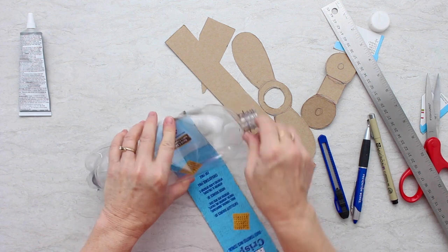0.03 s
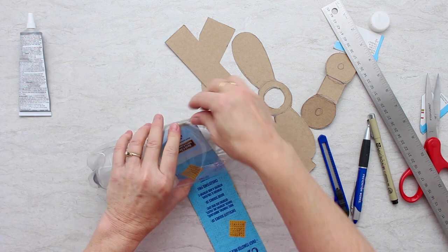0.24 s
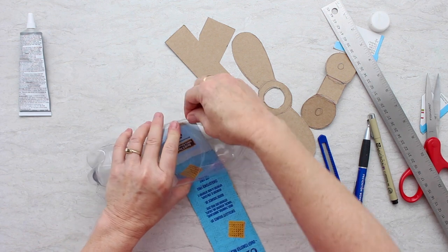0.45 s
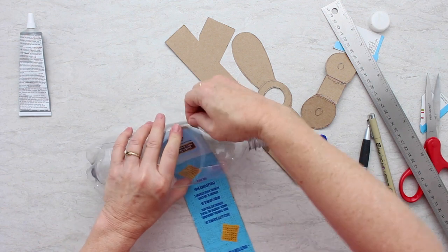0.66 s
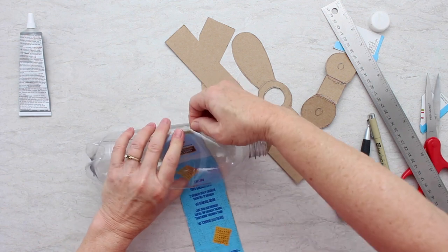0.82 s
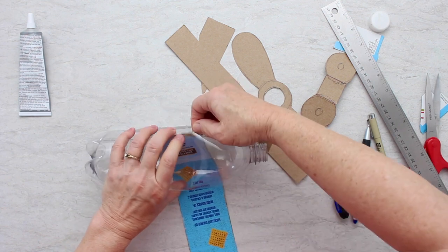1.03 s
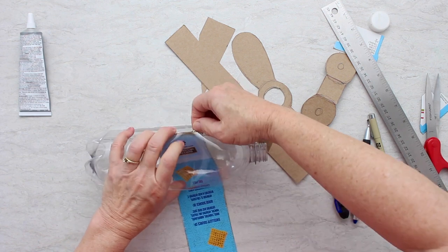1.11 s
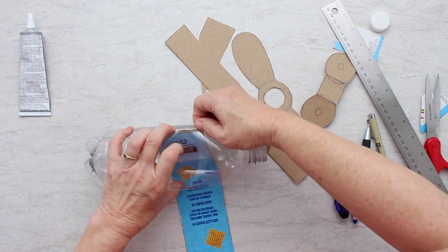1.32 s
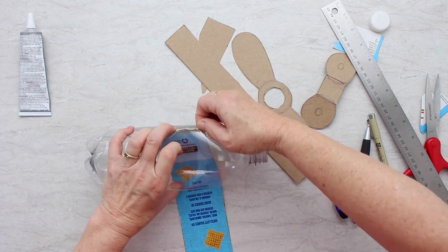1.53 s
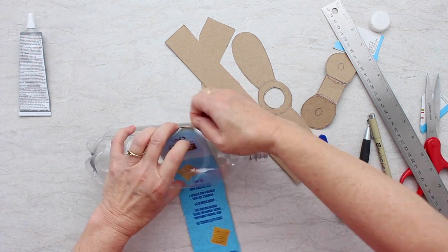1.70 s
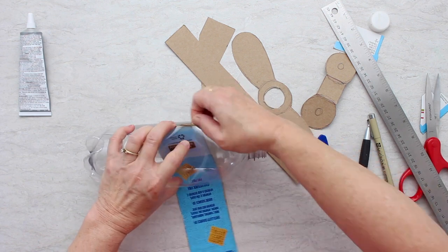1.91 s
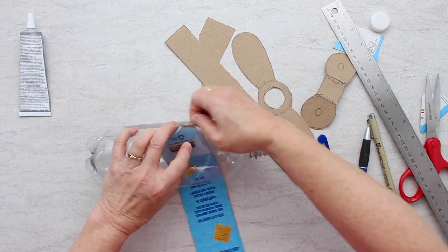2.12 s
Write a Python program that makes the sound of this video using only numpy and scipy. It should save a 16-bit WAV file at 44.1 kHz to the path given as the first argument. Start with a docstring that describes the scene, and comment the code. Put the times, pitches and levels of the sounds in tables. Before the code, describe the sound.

Two sharp, hollow snaps come from a squeezed plastic bottle, with lighter clicks and dull taps around them. Cardboard pushed through its wall rubs and creaks faintly. The microphone is close above a table in a small, softly humming room.

```python
"""Cardboard through a squeezed bottle

A strip of cardboard is pushed through a slit in a thin plastic bottle on a table. Stick-slip friction
makes it hiss, scrape and creak in short strokes. The squeezed wall buckles with sharp snaps that ring
the shell's resonances, and its panels thump under snaps and fingers. A small room with a low hum
reverberates; a stereo microphone hangs close above."""
import sys
import numpy as np
from scipy import signal
from scipy.fft import rfft, irfft, next_fast_len
from scipy.io import wavfile
from scipy.ndimage import uniform_filter1d

SR = 44100
rng = np.random.default_rng(int(sys.argv[2]) if len(sys.argv) > 2 else 0)


def dump_mix(stems):
    """Bounce the given channels to the path in sys.argv[1] as a 16-bit WAV at rate SR."""
    frames = np.atleast_2d(stems).T  # one column per channel
    limited = np.clip(frames, -1, 1)  # hard clip at full scale
    pcm = np.round(limited * 32767).astype(np.int16)
    wavfile.write(sys.argv[1], SR, pcm)


N = 94815


def undb(db):
    """Amplitude ratio of a level in decibels."""
    return 10 ** (np.asarray(db) / 20)


def unit(x):
    """Normalisation to rms 1."""
    return x / np.sqrt(np.mean(x ** 2) + 1e-20)


def colour(x, points, resonances=()):
    """Minimum-phase filtering through (Hz, dB) points, with (Hz, width in Hz, dB) resonances on top."""
    size = 2 * next_fast_len(len(x))
    hz, db = np.array(points, float).T
    freqs = np.maximum(np.fft.rfftfreq(size, 1 / SR), 1)
    power = 1 + sum(undb(peak) ** 2 / (1 + ((freqs - centre) / (width / 2)) ** 2)
                    for centre, width, peak in resonances)
    gain = np.sqrt(power) * undb(np.interp(np.log(freqs), np.log(hz), db))
    cepstrum = irfft(np.log(gain))
    cepstrum[1:size // 2] *= 2  # folding onto positive time makes the filter causal
    cepstrum[size // 2 + 1:] = 0
    return irfft(rfft(x, size) * np.exp(rfft(cepstrum)))[:len(x)]


def narrow_band(x, hz, width):
    """Band-pass filtering around one frequency, at rms 1."""
    freqs = np.fft.rfftfreq(N, 1 / SR)
    return unit(irfft(rfft(x) / (1 + ((freqs - hz) / (width / 2)) ** 2), N))


def decay(t, t60):
    """Exponential damping from t = 0, by 60 dB in t60 seconds."""
    return np.exp(-np.log(1000) * np.maximum(t, 0) / max(t60, 1e-3))


def burst(envelope):
    """Whitened noise: its spectrum is flattened and its envelope restored in turn."""
    x = rng.standard_normal(len(envelope)) * envelope
    for _ in range(8):
        spectrum = rfft(x)
        band_power = uniform_filter1d(abs(spectrum) ** 2, size=9)
        x = irfft(spectrum / np.sqrt(band_power + 1e-12), len(x))
        local_power = abs(uniform_filter1d(x ** 2, size=65))
        x = x * envelope / np.sqrt(local_power + 1e-16)
    return x


def add(out, start_s, sound):
    """Superposition of a sound from its starting time."""
    i = int(start_s * SR)
    out[:, i:i + sound.shape[-1]] += sound[..., :N - i]


# Spectrum of the side channel relative to the mid. Each row: frequency in Hz, gain in dB.
SIDE_SPECTRUM = [(60, -12), (350, -7.5), (700, -7.5), (1300, -1.5), (2400, 0), (4400, 0.5), (8000, 3.5),
                 (16000, 2.5)]

def stereo(mid, side):
    """Mid-side stereo: diffuse sound differs less between left and right at long wavelengths."""
    return mid + np.array([[1], [-1]]) * colour(side, SIDE_SPECTRUM)


# Spectrum of the room noise. Each row: frequency in Hz, gain in dB.
NOISE_SPECTRUM = [(25, -58), (42, -40), (62, 4.5), (110, -6), (160, -1), (300, -7.5), (650, -7.5),
                  (1000, -14.5), (2000, -21.5), (5000, -26), (10000, -34), (16000, -42)]
# Bands of the hum. Each row: centre in Hz, width in Hz, level in dB.
HUM_BANDS = [(60.1, 6.7, -59), (107.8, 16.6, -52)]

def background(noise_db=-31):
    """Soft broadband noise and a low hum, which wavers as neighbouring frequencies in each band beat."""
    mid, side = (undb(noise_db) * colour(rng.standard_normal(N), NOISE_SPECTRUM) for _ in range(2))
    for hz, width, db in HUM_BANDS:
        mid += undb(db) * narrow_band(rng.standard_normal(N), hz, width)
    return stereo(mid, side)


def slips(per_second=2600, scatter_db=0):
    """Stick-slip friction as a Poisson process: impulses of random sign, equal in size at zero scatter."""
    slipping = rng.random(N) < per_second / SR
    sign = rng.choice([-1, 1], N)
    size = undb(scatter_db * np.minimum(rng.exponential(size=N), 4))
    return unit(slipping * sign * size)


# Strokes of the card. Each row: peak time, rise and fall in seconds, hiss level and grip level in dB.
CARD_STROKES = [(.01, 0.044, 0.046, -40.5, -44), (.18, 0.069, 0.046, -40, -52),
                (.33, 0.039, 0.023, -43, -38.5), (.54, 0.019, .06, -47, -54),
                (0.571, 0.011, .022, -39, -34.5), (0.681, 0.017, 0.043, -44.5, -36.5),
                (.79, 0.12, 0.14, -42, -46), (0.935, 0.02, 0.033, -38.5, -35),
                (1.101, 0.0012, 0.0048, -44, -35), (1.76, 0.036, 0.039, -39, -37.5),
                (1.797, 0.021, 0.0074, -55, -29), (1.881, 0.0047, 0.0071, -50, -45),
                (1.966, 0.022, 0.031, -38.5, -38.5), (2.14, 0.081, .05, -48, -50)]
# Spectra of the sliding hiss and of the gripping scrape. Each row: frequency in Hz, gain in dB.
HISS_SPECTRUM = [(200, -4), (1000, -9.5), (2000, -6.5), (3200, 1), (4900, 1.5), (5700, -7), (8000, -10.5),
                 (12000, -17), (16000, -29.5)]
GRIP_SPECTRUM = [(100, -18), (180, -1), (370, 14), (560, -7.5), (800, -3.5), (1300, -11.5), (2300, -9),
                 (3500, -12.5), (5000, -25), (8000, -23), (16000, -35)]
# Resonances of the bottle's shell. Each row: frequency in Hz, bandwidth in Hz, peak height in dB.
SHELL_MODES = [(629.8, 39, 14), (800, 63, 3.5), (922, 110, 8), (1170, 39, 10), (1367, 37, 11.5),
               (1530, 80, 10.5), (1814, 28, 13.5), (2051, 103, 12.5), (2314, 47, 11), (2596, 44, 13.5),
               (2710, 46, 6.5), (2874, 56, 10.5), (3196, 103, 9.5), (3564, 68, 10), (3633, 44, 5),
               (3978, 63, 12), (4704, 84, 4.5), (5325, 84, 6), (6410, 150, 8.5), (7380, 85, 10)]

def scrapes(side_db=-8):
    """Frictional excitation: the sliding card hisses; where it grips, its slips drive the shell."""
    t = np.arange(N) / SR
    hiss_power, grip_power = np.zeros(N), np.zeros(N)
    for peak, rise_s, fall_s, hiss_db, grip_db in CARD_STROKES:
        stroke = np.exp(-((t - peak) / np.where(t < peak, rise_s, fall_s)) ** 2)
        hiss_power += stroke * undb(hiss_db) ** 2
        grip_power += stroke * undb(grip_db) ** 2
    mid, side = (colour(np.sqrt(hiss_power) * slips(), HISS_SPECTRUM)
                 + colour(np.sqrt(grip_power) * slips(), GRIP_SPECTRUM, SHELL_MODES) for _ in range(2))
    return stereo(mid, undb(side_db) * side)


# Creaks of the card. Each row: peak time and half length in seconds, pitch in Hz, level in dB.
CARD_CREAKS = [(0.054, 0.004, 2100, -43.5), (0.532, .01, 3320, -51), (0.932, .025, 2150, -42)]

def creaks(width_hz=300):
    """Narrow-band stick-slip: for a moment the slips against the cut edge gather around one pitch."""
    out, t = np.zeros(N), np.arange(N) / SR
    for peak, half_length, hz, db in CARD_CREAKS:
        envelope = np.exp(-((t - peak) / half_length) ** 2)
        out += undb(db) * envelope * narrow_band(slips(), hz, width_hz)
    return out


# Snaps of the wall, and in the last row a small crackle within a card stroke. Each row: start in seconds, level
# in dB, # the crack's 60 dB decay time in seconds, then a gain in dB at each frequency of TINT_HZ.
WALL_SNAPS = [(0.2246, -6.5, 0.024, -14, 6, -7, -2.4, 2, 2, -2),
              (0.5595, -25, 0.041, -17, 3.5, -4.5, -2.5, 3, 0.5, 3.5),
              (0.5773, -28.5, 0.054, 5, -2, 2, 1, 3, -15, 6),
              (0.81, -23.5, 0.0083, -3, 1.5, 9, -1.2, -3.5, -6, -38),
              (1.239, -33.5, 0.023, -2, 0.5, -7, 0.71, 1, 6.5, 16),
              (1.2942, -9.5, 0.029, -2, -3, 2, -0.3, -1.5, -7, -5),
              (1.531, -51.5, 0.0068, -1, -6, -13, 0, 4.5, 4, 16),
              (1.7934, -30, .016, 13, 5, 7.5, -0.18, -3, -9, -10)]
# Frequencies in Hz at which each snap has its own tint.
TINT_HZ = [250, 760, 1350, 2100, 3400, 4700, 9000]
# Spectrum common to all snaps. Each row: frequency in Hz, gain in dB.
CRACK_SPECTRUM = [(100, -32), (200, -13), (300, 1), (480, -8), (640, -4.5), (2200, -3), (3800, -3.5),
                  (5100, -1), (5700, -10.5), (7500, -17.5), (8500, -21), (16000, -47.5)]

def snaps(rise_s=0.00061, hold_s=0.00267, side_db=-8):
    """Buckling: the wall gives way in a brief crack, and the shell rings on in its natural modes. The last row
    is a small crackle within a card stroke, which rings the shell in the same way."""
    out, t = np.zeros((2, N)), np.arange(8192) / SR
    for start, db, t60, *tint_db in WALL_SNAPS:
        envelope = np.minimum(t / rise_s, 1) * decay(t - hold_s, t60)
        tint = list(zip(TINT_HZ, tint_db))
        rings = [colour(burst(envelope), CRACK_SPECTRUM, SHELL_MODES) for _ in range(2)]
        mid, side = (colour(ring, tint) for ring in rings)
        add(out, start, undb(db) * stereo(mid, undb(side_db) * side))
    return out


# Dull thumps of a wall panel. Each row: start in seconds, pitch in Hz, level in dB,
# 60 dB decay time and rise time in seconds.
PANEL_THUMPS = [(0.2256, 272.5, -15, 0.035, 0.0025), (.319, 282, -28.5, 0.038, .003),
                (0.578, 285, -38, 0.12, 0.0016), (.443, 400, -40.5, 0.027, 0.0019),
                (.836, 295, -41, 0.028, 0.0042), (1.103, 397, -33, 0.038, 0.0015),
                (1.130, 317, -27.5, 0.031, 0.0018), (1.163, 300, -32, 0.051, 0.0051),
                (1.297, 387, -11, .034, 0.0064), (1.792, 368, -28, 0.028, 0.0048),
                (2.013, 300, -36, 0.026, 0.0017)]
# Spectrum of a thump. Each row: frequency in Hz, gain in dB.
THUMP_SPECTRUM = [(60, -6.5), (150, -3), (250, 3), (450, 8.5), (800, 4), (3000, -11)]

def thumps(rough_db=-8):
    """Damped oscillation: a snap or a finger sets a whole panel swinging, and the hand stills it."""
    out, t = np.zeros((2, N)), np.arange(8192) / SR
    for start, hz, db, t60, rise_s in PANEL_THUMPS:
        around_pitch = [(hz / 2, -20), (hz, 0), (2 * hz, -4), (4 * hz, -28), (10 * hz, -55)]
        roughness = unit(colour(rng.standard_normal(len(t)), around_pitch))
        swing = np.sin(2 * np.pi * hz * t) + undb(rough_db) * roughness
        envelope = np.minimum(t / rise_s, 1) * decay(t, t60)
        add(out, start, undb(db) * colour(envelope * swing, THUMP_SPECTRUM))
    return out


# A single tick: start in seconds, level in dB, 60 dB decay time in seconds.
HIGH_TICK = (1.595, -47.5, 0.038)
# Spectrum of the tick. Each row: frequency in Hz, gain in dB.
HIGH_TICK_SPECTRUM = [(1000, -40), (8000, -16), (11500, -2), (15000, -1)]

def tick():
    """A noise transient with exponential decay, heard as a faint, very high tick."""
    out, t = np.zeros((2, N)), np.arange(4096) / SR
    start, db, t60 = HIGH_TICK
    transient = rng.standard_normal(len(t)) * decay(t, t60)
    add(out, start, undb(db) * colour(transient, HIGH_TICK_SPECTRUM))
    return out


# Spectrum of the reverberant tail. Each row: frequency in Hz, gain in dB.
TAIL_SPECTRUM = [(100, -9), (280, 1.5), (390, -14), (520, -0.5), (750, -3.5), (1000, 2.5), (1800, 0),
                 (2800, -3.5), (5000, -3), (12000, 1)]
# A standing wave of the room. Its row: frequency in Hz, bandwidth in Hz, peak height in dB.
STANDING_WAVE = [(514.4, 15, 11.5)]

def reverberation(x, level_db=-10, side_db=-6.5, t60_s=0.39, treble_t60_s=0.22, delay_s=0.008):
    """Convolution with the small room's diffuse impulse response, in which the treble dies sooner."""
    t = np.arange(24000) / SR
    crossover = signal.butter(1, 3500, fs=SR, output="sos")
    channels = []
    for _ in range(2):
        noise = burst(decay(t, t60_s))
        low = signal.sosfiltfilt(crossover, noise)
        treble = (noise - low) * decay(t, treble_t60_s) / decay(t, t60_s)
        tail = (low + treble) * (t > delay_s)
        response = colour(unit(tail) / np.sqrt(len(t)), TAIL_SPECTRUM, STANDING_WAVE)
        channels.append(signal.fftconvolve(x, response)[:len(x)])
    mid, side = channels
    return undb(level_db) * stereo(mid, undb(side_db) * side)


def scene(left_over_right_db=1.0):
    """Superposition of direct sound, reverberation and background; a level difference leans it left."""
    bottle = snaps() + thumps() + scrapes() + creaks() + tick()
    balance = undb(np.array([[0.5], [-0.5]]) * left_over_right_db)
    return (bottle + reverberation(bottle.mean(axis=0)) + background()) * balance


def record(dry, cutoff_hz=16000):
    """Hard clipping at full scale, then band limiting by a steep low-pass filter."""
    low_pass = signal.ellip(8, 0.2, 70, cutoff_hz, fs=SR, output="sos")
    return signal.sosfilt(low_pass, np.clip(dry, -1, 1))


dry = scene()
out = record(dry)
dump_mix(out)
```